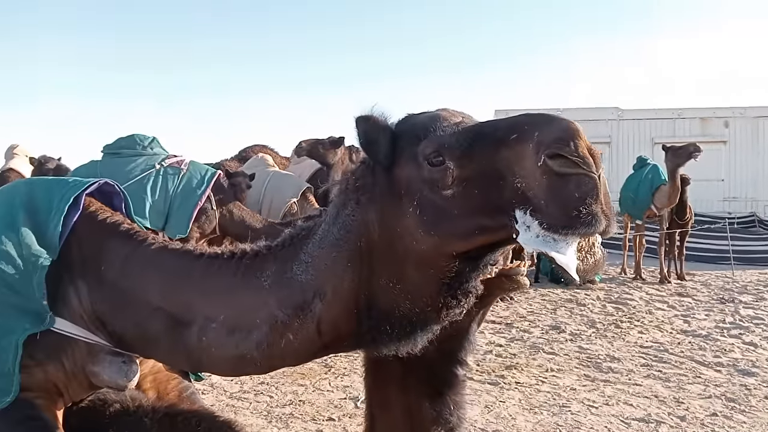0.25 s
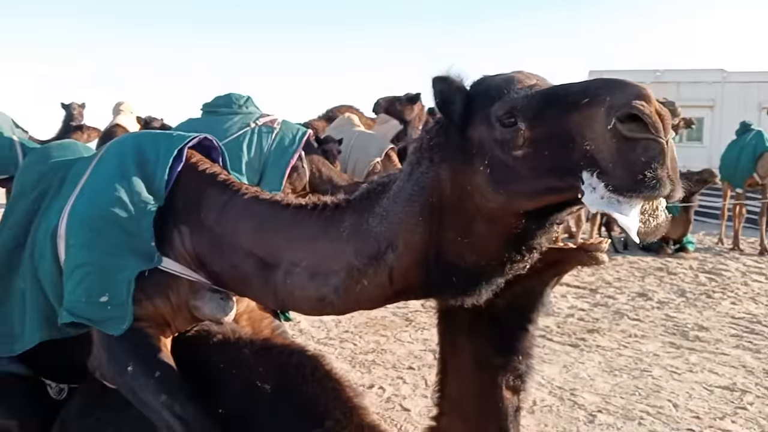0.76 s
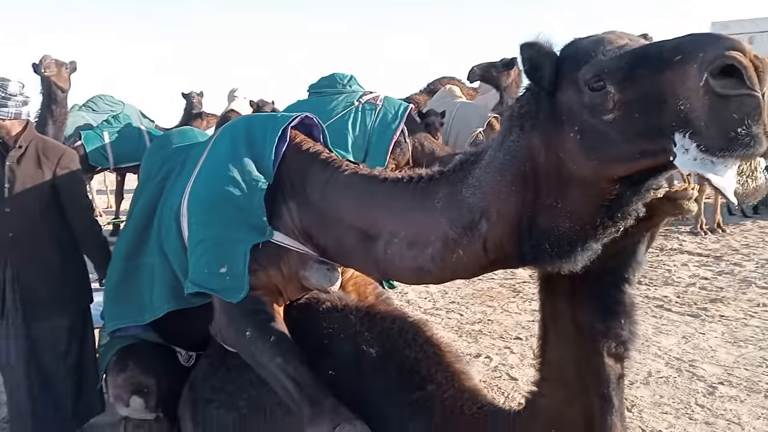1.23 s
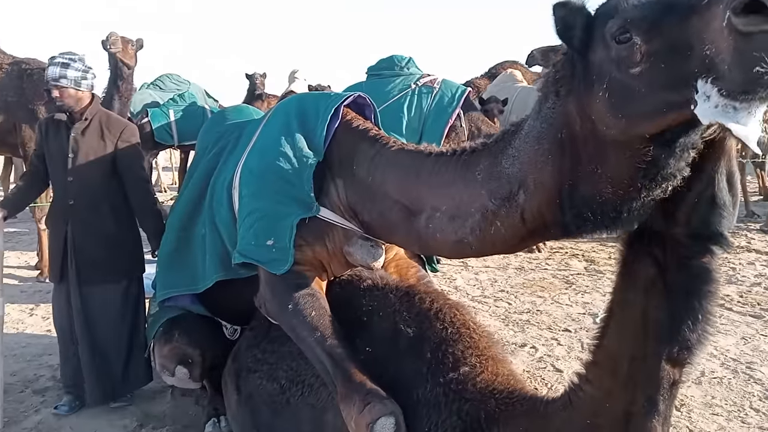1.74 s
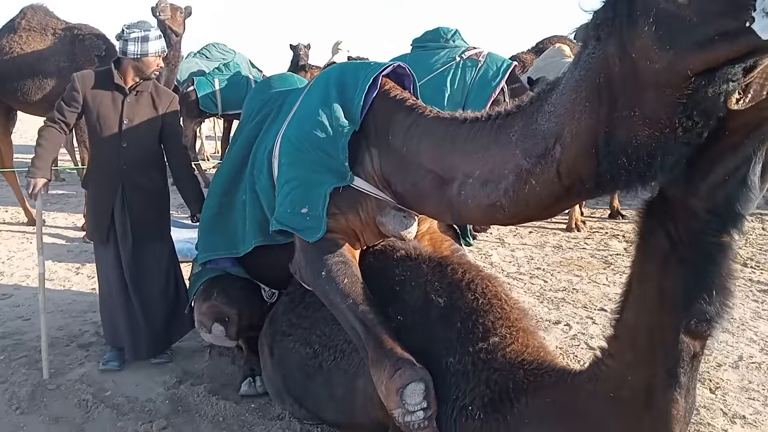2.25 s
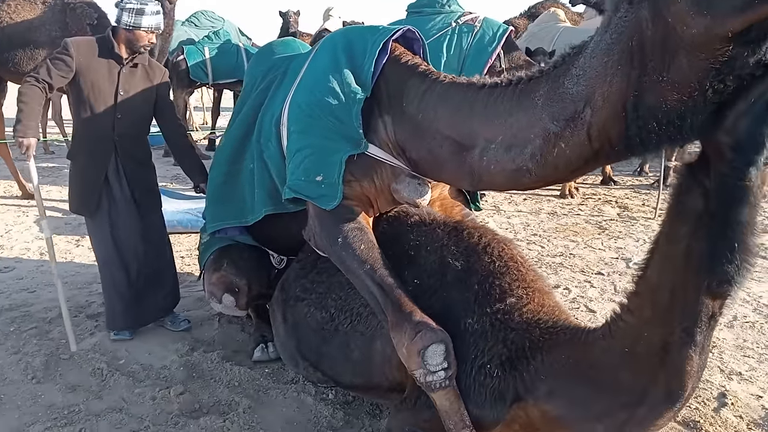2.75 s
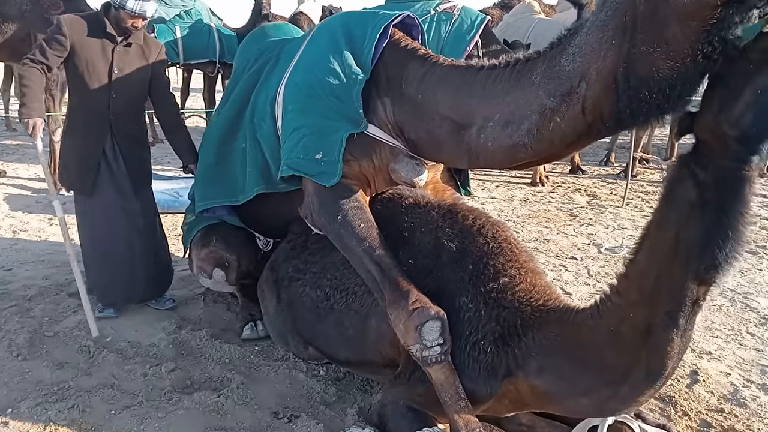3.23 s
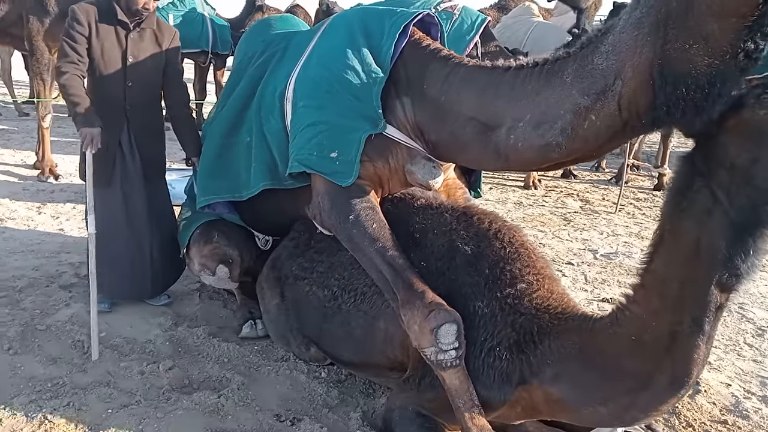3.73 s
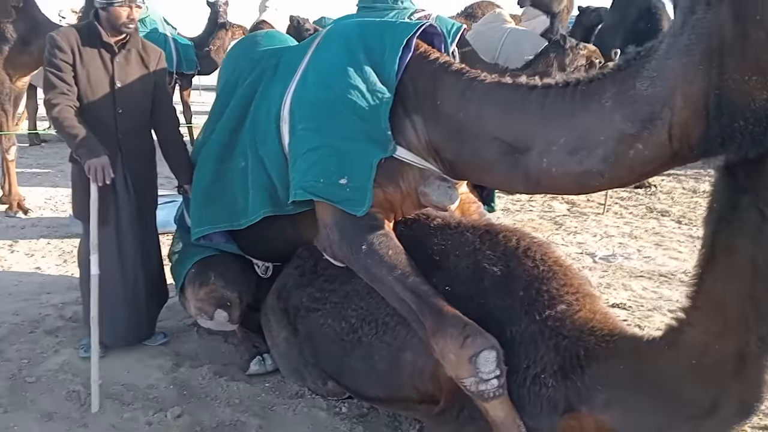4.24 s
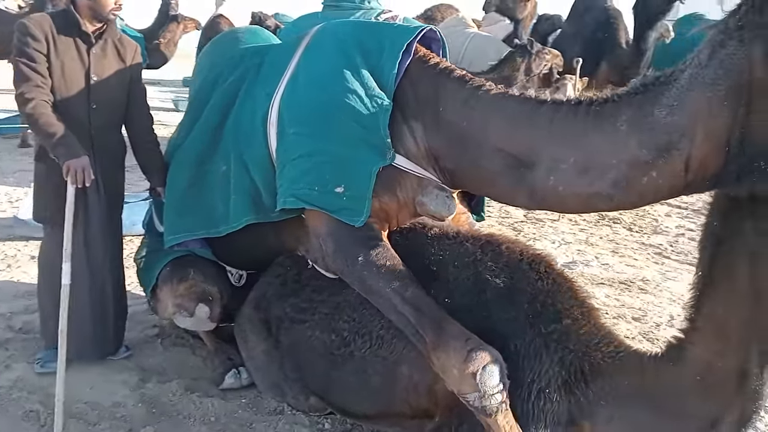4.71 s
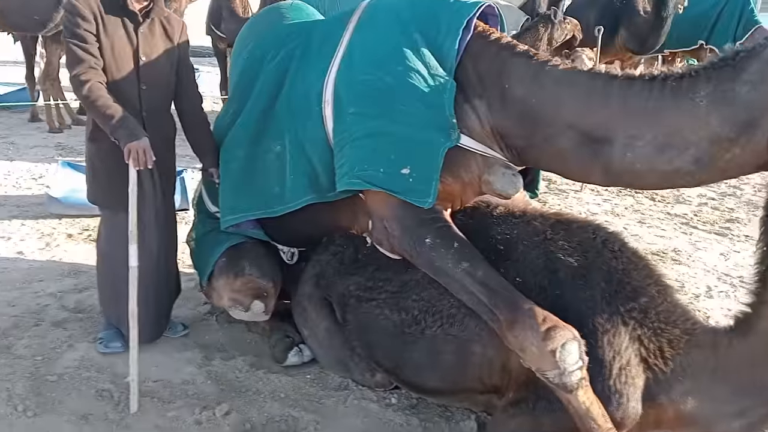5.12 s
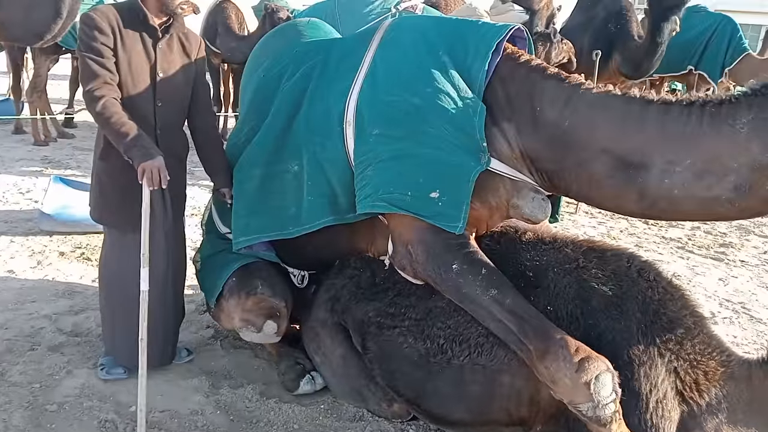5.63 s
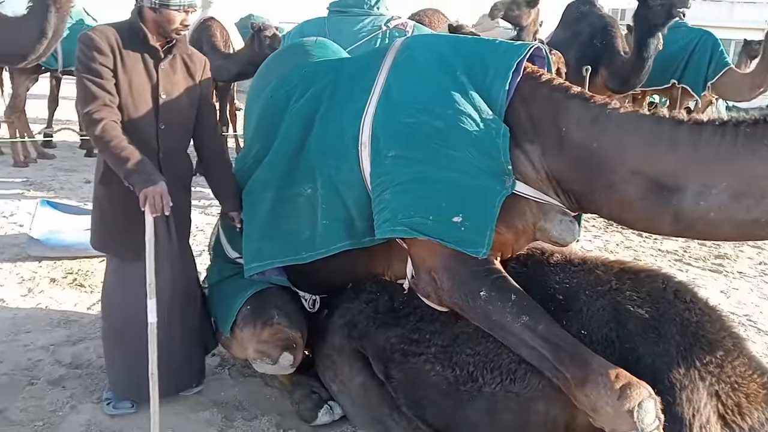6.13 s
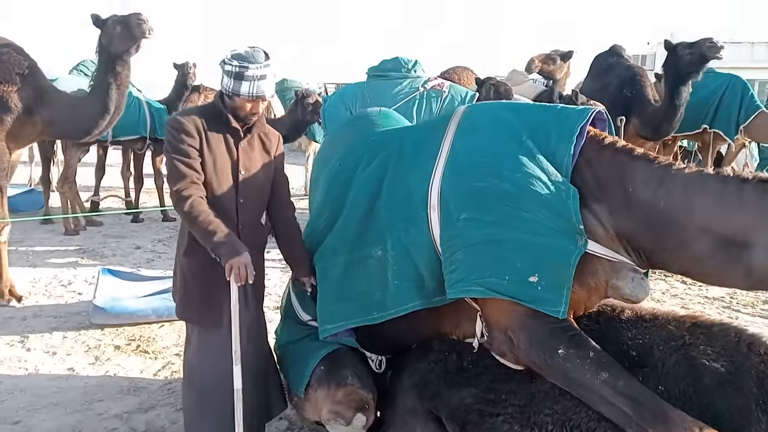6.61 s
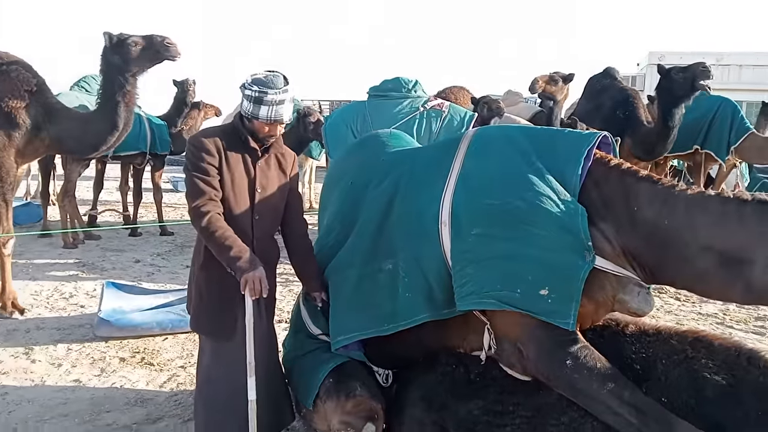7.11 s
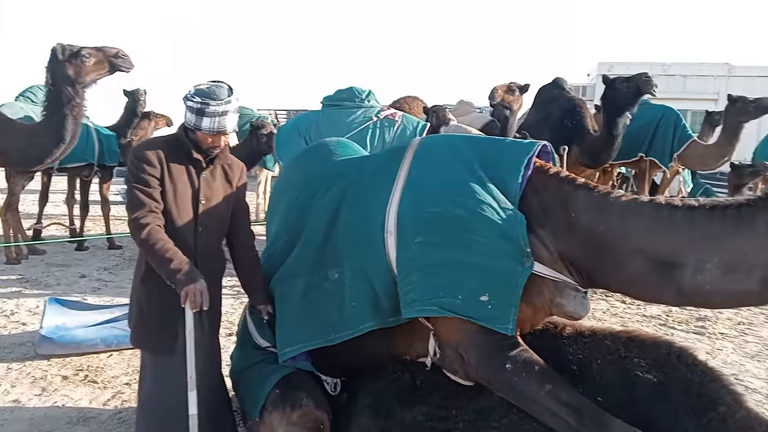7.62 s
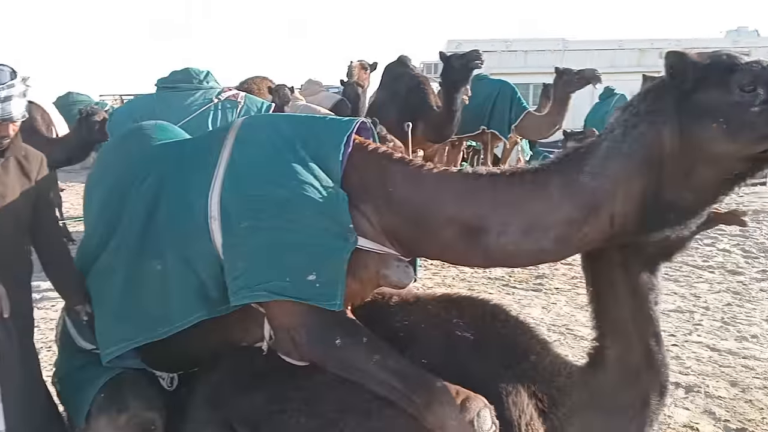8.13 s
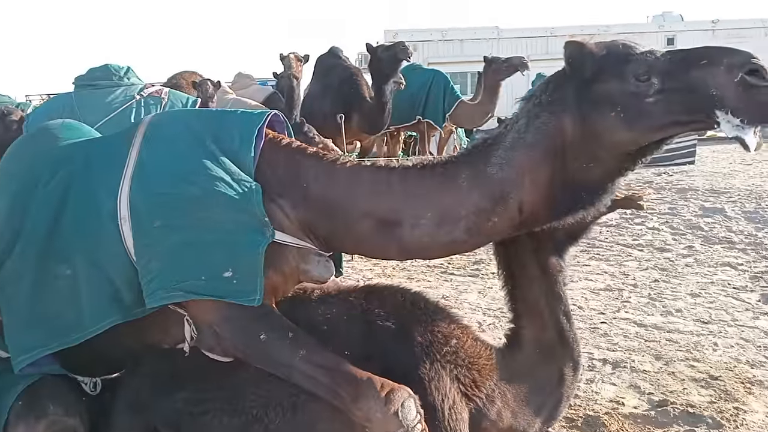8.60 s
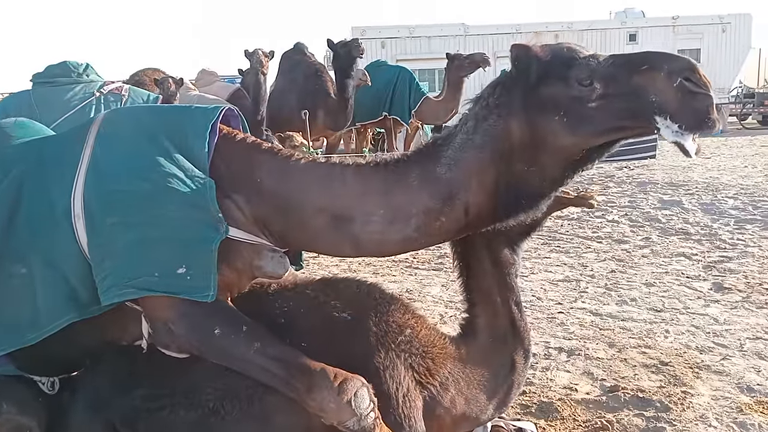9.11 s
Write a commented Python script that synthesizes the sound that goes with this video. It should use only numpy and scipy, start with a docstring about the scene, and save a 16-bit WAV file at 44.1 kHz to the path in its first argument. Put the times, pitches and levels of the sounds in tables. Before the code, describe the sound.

Five rough, guttural camel roars, the last three nearly joined, with thin rasps and frothy hisses between, under buffeting wind outdoors and a few bird chirps.

```python
"""Camel roaring in a windy pen

A rutting male camel roars in long calls close to a microphone in an open, windy pen.
Slack vocal folds slap unevenly, mostly strong and weak by turns, and ring four gliding throat resonances.
Thin rasps, squeaks, wet clicks and hisses of air come between and over the roars.
Gliding sines make the squeaks, a faint far whine near the end and a small bird.
Shaped noise makes the gusts on the microphone, the still air and a far herd."""
import sys
import numpy as np
from scipy import signal
from scipy.fft import rfft, irfft, next_fast_len
from scipy.io import wavfile
from scipy.ndimage import uniform_filter1d, minimum_filter1d, map_coordinates

SR = 44100
rng = np.random.default_rng(int(sys.argv[2]) if len(sys.argv) > 2 else 0)


def generate_wav(signal):
    """Clip the signal to [-1, 1] and save it as 16-bit WAV at the path in sys.argv[1]."""
    frames = np.transpose(np.atleast_2d(signal))
    scaled = np.clip(frames, -1, 1) * 32767
    pcm = np.round(scaled).astype(np.int16)
    wavfile.write(sys.argv[1], SR, pcm)


N = 412776
TIME_S = np.arange(N) / SR

# Course of each roar, one table a roar: (time [s], lowest resonance [Hz], effort [dB],
# second and third resonances over effort [dB], fourth resonance over effort [dB])
ROARS = [
    [(1.24, 293, -31.5, -14, -28), (1.3, 276, -10, -6.5, -17), (1.41, 315, -10, -6, -22.5),
     (1.56, 304, -14.5, -3, -20), (1.72, 278, -16.5, -2, -10.5), (1.85, 293, -15, -1, -12),
     (1.93, 264, -15, -15, -22.5), (2.03, 255, -26, -9, -12.5)],
    [(2.82, 235, -17, -10.5, -24), (2.89, 268, -6.5, -8.5, -38), (3.04, 265, -11.5, -7.5, -37),
     (3.13, 238, -16.5, -11, -35.5), (3.21, 262.6, -15.5, -4, -19), (3.35, 255, -10.5, -6, -18),
     (3.53, 248, -16.5, -6.5, -17.5), (3.68, 274.5, -16, -7, -12.5), (3.87, 279, -18.5, -4, -8),
     (4.05, 288, -23, -8, -15), (4.11, 267, -35.5, -18, -15)],
    [(6.2, 293, -36.5, -9.5, -25.5), (6.29, 316.5, -5.5, -12.5, -22.5), (6.39, 349, -14.5, -5.5, -24),
     (6.48, 352, -8.5, -12, -24.5), (6.58, 345, -16, -7.5, -15.5), (6.7, 310, -17.5, -11.5, -25),
     (6.8, 290, -40.5, -15.5, -32)],
    [(6.91, 293, -21, -39, -27.5), (6.99, 299, -23.5, -16.5, -25), (7.09, 306, -6, -16.5, -15.5),
     (7.26, 318, -13.5, -17, -9), (7.55, 313, -16.5, -15, -9.5), (7.68, 332, -22.5, -18.5, -11),
     (7.79, 325, -18.5, -18.5, -8)],
    [(7.78, 329, -24.5, -16, -11), (7.87, 300, -12, -12.5, -19), (7.96, 314, -11, -8.5, -17),
     (8.11, 353, -11.5, -4.5, -15), (8.25, 327.5, -15, -12.5, -18), (8.33, 318, -19, -13.5, -18),
     (8.53, 320, -14, -15.5, -15.5), (8.7, 286, -34.5, -30, -21.5)],
]
# Glides of the three higher throat resonances, one table a roar:
# (start [Hz], end [Hz], start level [dB], end level [dB])
GLIDES = [
    [(692, 659, 0, 0.5), (1142, 1010, -8.5, -10.5), (1720, 1590, 0, 1)],
    [(590, 703, 2, -2.5), (916, 1080, -13.5, -18), (1730, 1640, -2, 0.5)],
    [(660, 490, 1, -9.5), (964, 912, -9, 5), (1565, 1630, 1, -0.5)],
    [(860, 870, -1.5, 3.5), (1224, 1150, 6.5, -13), (1739, 1698, -1, -1)],
    [(734, 850, -2.5, -1.5), (1076, 1240, -17, -6.5), (1674, 1733, 3, -2)],
]
# Vocal folds, one row a roar: (first rate [slaps/s], settled rate [slaps/s], settling time [s],
# weakening of every second slap [0-1], irregularity at start [0-1], irregularity at end [0-1])
FOLDS = [(142.3, 74, .25, 0.43, 0.53, .48), (111, 61, .09, 0.14, .35, .1), (138.5, 58, .35, 0, .6, .42),
         (89.9, 73, 0.23, 0.32, .3, .3), (94.88, 72, .6, 0.41, .3, .55)]
# Marked slaps: (time [s], level against a typical slap [dB])
HARD_SLAPS = [(1.406, 3), (1.579, 2.5), (1.91, -1), (2.098, 3), (2.133, 4), (2.237, 9.5), (2.287, 4.5),
              (2.311, 10.5), (2.874, 4), (3.25, -0.5), (3.333, -0.5), (3.444, 2), (3.475, 2), (3.72, 0.5),
              (3.836, 8.5), (3.864, 10), (3.928, 6), (3.957, 9.5), (6.267, 5.5), (6.416, 7.5), (6.531, 6),
              (6.744, 13), (7.048, 0.5), (7.128, -0.5), (7.232, 5), (7.343, 2.5), (7.4, 2), (7.483, 2),
              (8.524, 2.5)]
# Four throat resonances: (width [Hz], skirt width [Hz])
THROAT = [(26.7, 177), (50, 430), (72.4, 730), (62, 230)]
# Neighbour of each throat resonance, one table a roar: (frequency factor [1], level [dB])
NEIGHBOURS = [
    [(1.377, -7), (1.143, -6.5), (1.11, -6), (1.08, -3)],
    [(1.68, -11), (1.263, -12), (1.7, -11), (1.14, -6.5)],
    [(3.75, -29.5), (1.1, -5.5), (1.3, -4), (1.07, 1.5)],
    [(1.645, -19), (0.702, 1), (.9, -13.5), (.94, -16.5)],
    [(1.63, -21.5), (1.1, -4.5), (.87, -5.5), (.92, -7)],
]
# Upper resonances of mouth and nose, one table a roar: (frequency [Hz], width [Hz], level [dB])
MOUTHS = [
    [(2286, 240, 2.5), (2480, 70, -11.5), (3320, 120, -3.5), (4000, 99, -7.5), (5000, 440, -18),
     (6200, 460, -22), (9900, 2100, -28.5)],
    [(2220, 310, -0.5), (2650, 270, -4), (3430, 170, -8.5), (3960, 180, -7), (5270, 690, -15),
     (6500, 890, -17.5), (9200, 1500, -25.5)],
    [(2130, 35, -2), (2500, 66, -12.5), (3270, 100, -12), (4000, 190, -12), (5050, 200, -25),
     (5900, 160, -18), (9600, 1500, -24)],
    [(2270, 69, 1), (2700, 130, -7.5), (3280, 540, -2.5), (4270, 240, -1.5), (5400, 250, -13.5),
     (6170, 220, -12.5), (9600, 1100, -15.5)],
    [(2000, 68, 5), (2187, 110, 4), (2700, 110, -2.5), (3350, 330, 1), (4200, 240, -2.5),
     (5400, 250, -15.5), (6230, 220, -15), (9000, 900, -19.5)],
]
# Mouth and nose relative to effort, one value a roar: (level [dB])
MOUTH_DB = [-27.5, -32, -37, -36, -36.5]
MOUTH_SHARE = 0.23  # share of the fourth resonance's lift

# Thin open-mouthed rasps: (start [s], length [s], start frequency [Hz], end frequency [Hz],
# level [dB], upper resonances' level [dB])
RASPS = [(-.08, .24, 1750, 1700, -41, -50), (1.982, .52, 1663, 1454, -25.5, -37.5),
         (2.755, 0.26, 2500, 2405, -43.5, -57), (7.723, 0.23, 1965, 2146, -37.5, -49.5),
         (9.193, .28, 1510, 1530, -43.5, -46)]
# Vocal folds in a rasp: (columns as in FOLDS)
RASP_FOLDS = (72, 64, 0.16, 0.25, .62, .56)
# Rasp resonances: (factor on main resonance [1], width [Hz], level [dB])
RASP_MODES = [(0.632, 107, -7.5), (.9, 55, -9.5), (0.996, 47.6, -1.5), (1.149, 50, -14)]
# Upper resonances, mouth wide open: (frequency [Hz], width [Hz], level [dB])
GAPE = [(2050, 70, -5), (2242, 34, 3), (3130, 70, -8), (3270, 31, -1.5), (3805, 250, -7.5), (4060, 89, -13),
        (5600, 600, -24), (6960, 600, -29.5), (9550, 700, -32.5)]
RASP_RISE_S, RASP_FALL_S = 0.12, 0.11

# Squeaks as the voice catches, and last a faint far whine:
# (start [s], length [s], start frequency [Hz], end frequency [Hz], level [dB])
SQUEAKS_AND_WHINE = [(2.795, 0.037, 1377, 1604, -28.5), (7.715, 0.037, 1370, 1570, -33),
                     (9.0, 0.18, 1400, 1375, -57.5)]
# Wet mouth clicks: (time [s], peak level [dB], frequency [Hz])
SMACKS = [(1.39, -39.5, 4000), (5.737, -47, 3000), (5.784, -30, 1440), (5.871, -40, 1900),
          (7.865, -35.5, 4470), (7.881, -43, 5000), (7.958, -40, 4000)]

# Hisses of the camel's air, before BLOW_TRIM_DB: (start [s], length [s], start level [dB], end level [dB])
BLOWS = [(2.453, 0.47, -46, -49.5), (4.058, 0.87, -46.5, -51.5), (5.069, .52, -51, -54.5),
         (6.733, 0.55, -48.5, -47.5)]
# Hiss spectra, one table a blow: (frequency [Hz], level [dB])
BLOW_COLOURS = [
    [(1000, 5), (1900, 6.5), (2600, -7.5), (3400, -4), (4500, -14), (6400, -19), (8000, -27), (14000, -38)],
    [(1000, -0.5), (2300, 3.5), (2800, -2.5), (3400, 7.5), (4600, 1.5), (5400, -13.5), (7000, -13.5),
     (8000, -25), (9500, -24), (14000, -39)],
    [(1000, 4.5), (2300, 0.5), (3200, 2), (4400, -4), (5400, -8.5), (7000, -11.5), (8000, -21), (9500, -21),
     (14000, -31)],
    [(900, 4), (1800, 9.5), (2800, 3), (3800, 3), (5000, -6.5), (6200, -10.5), (7500, -23), (9500, -25),
     (14000, -36.5)],
]
BLOW_RISE_S, BLOW_FALL_S = 0.048, 0.05
BLOW_TRIM_DB, BLOW_ARCH_DB = -5.0, 4  # the arch lifts the middle

# Bird notes, before BIRD_TRIM_DB: (start [s], length [s], start frequency [Hz], end frequency [Hz], level [dB])
CHIRPS = [(5.31, .06, 6300, 4000, -62), (5.385, 0.031, 3600, 5000, -45), (5.835, 0.029, 5600, 7600, -58.5),
          (5.855, 0.075, 6500, 3960, -51.5), (5.87, 0.08, 6730, 5400, -68),
          (5.945, 0.032, 3690, 4580, -44.5), (5.975, 0.01, 4550, 3980, -61.5),
          (7.16, 0.043, 5930, 5050, -48.5), (7.24, 0.048, 3950, 3770, -44)]
BIRD_TRIM_DB = -6.5

# Strongest gusts: (middle [s], length [s], rumble level [dB], eddy level [dB])
GUSTS = [(0.044, 0.044, -32.5, -15), (0.413, 0.058, -11.5, -10), (0.494, 0.092, -27, -12),
         (.905, 0.091, -14.5, -30.5), (0.999, 0.097, -14.5, -25.5), (1.072, 0.1, -17.5, -39),
         (2.155, 0.14, -15, -28), (2.381, 0.12, -16.5, -19.5), (2.668, 0.13, -15, -26),
         (2.813, 0.093, -14, -19.5), (3.302, 0.1, -19.5, -36), (4.258, 0.14, -21.5, -42),
         (4.44, 0.13, -19.5, -45), (4.551, 0.031, -20, -47), (4.708, 0.11, -22, -36),
         (4.998, 0.26, -19, -21), (5.188, 0.071, -17.5, -47), (5.522, 0.11, -22, -26),
         (5.663, 0.058, -19.5, -18.5), (6.055, 0.11, -13.5, -23.5), (6.992, 0.048, -13.5, -16),
         (8.11, 0.092, -15.5, -31), (8.398, 0.18, -15.5, -18), (8.546, .07, -11, -23.5),
         (8.637, 0.12, -17.5, -15.5), (8.904, 0.14, -12.5, -15.5), (8.998, 0.1, -15.5, -14.5),
         (9.167, 0.066, -10, -14.5), (9.208, 0.09, -11, -13), (9.295, 0.1, -10.5, -17.5),
         (9.35, 0.055, -1, -12)]
# Breeze between gusts, before buffeting: (time [s], rumble level [dB], eddy level [dB])
BREEZE = [(0, -31.5, -18), (.74, -21, -21), (.86, -30, -35), (1.25, -23.5, -39), (1.88, -37.5, -41.5),
          (2.12, -24.5, -27), (2.75, -17.5, -24.5), (3.05, -29.5, -35), (3.9, -31.5, -40.5),
          (4.35, -27, -43), (5.4, -26, -37.5), (6.2, -29.5, -41.5), (6.45, -53.5, -60), (6.9, -33.5, -53),
          (7.04, -23.5, -39), (7.85, -32.5, -41), (8.45, -22.5, -34.5), (9.36, -27, -31.5)]
# Spectrum of the rumble: (frequency [Hz], level [dB])
GUST_COLOUR = [(15, -49.5), (28, -36.5), (45, -13.5), (70, 2.5), (100, 6), (150, 6.5), (220, 0.5),
               (300, -7.5), (450, -21.5), (700, -45.5), (1500, -81)]
# Spectrum of the eddies: (frequency [Hz], level [dB])
EDDY_COLOUR = [(100, -35.5), (200, 12.5), (300, 8), (450, 1.5), (700, -9), (1000, -20), (1500, -31),
               (2500, -46.5), (5000, -61), (12000, -77.5)]

# Far herd lowing: (frequency [Hz], width [Hz], level [dB])
HERD = [(730, 160, -61.5), (1534, 28, -68.5), (1900, 140, -68)]
# Spectrum of the still air: (frequency [Hz], level [dB])
AIR = [(50, -15), (150, 0.5), (350, -15.5), (700, -29), (1100, -34), (1900, -31), (2400, -47), (3400, -42),
       (5000, -53.5), (7000, -54), (10000, -62), (15000, -70.5)]
AIR_DB = -41.5
EDGE_HZ = 15500


def roar(rows, glides, tension, neighbours, upper_modes, upper_db):
    """Slaps ring the long throat; its resonances glide, and bend a little with the lowest one."""
    low_air, high_air = 0.94, 12.0  # puff noise against slaps, throat and mouth
    throb_db, gurgle_db, follow = 1.85, 2, 0.13
    t, low_hz, effort_db, middle_db, front_db = controls(rows)
    effort_db = effort_db + throb_db * wander(t, 22)
    bend = (low_hz / low_hz.mean()) ** follow
    tracks = [(low_hz, effort_db)]
    for (hz0, hz1, db0, db1), lift_db in zip(glides, [middle_db, middle_db, front_db]):
        glide_hz = bend * np.linspace(hz0, hz1, len(t))
        tracks.append((glide_hz, effort_db + lift_db + np.linspace(db0, db1, len(t))))

    slaps, puffs, rough = folds(t, tension, puff_decay_s=0.0079, leak=0.15)
    mouth_level_db = effort_db + upper_db + MOUTH_SHARE * front_db
    sound = gain_of(mouth_level_db) * mouth(t, evened(slaps) + high_air * puffs, upper_modes)
    # a hard slap is brighter: higher resonances follow its strength more steeply
    powers = np.linspace(0.45, 1.9, len(THROAT))
    for k, power in enumerate(powers):
        drive = evened(slaps ** power) + low_air / power * rough * puffs
        drive *= gain_of(gurgle_db * wander(t, 59.9))  # the colour varies quickly
        (hz, level_db), (width_hz, skirt_hz), (factor, neighbour_db) = tracks[k], THROAT[k], neighbours[k]
        hz = hz * (1 + 0.013 * wander(t, 40) + 0.01 * wander(t, 8))
        ring = evened(resonate(drive, hz, width_hz, skirt_hz))
        neighbour = resonate(drive, hz * factor, width_hz * factor, skirt_hz)
        ring += gain_of(neighbour_db) * evened(neighbour)
        polarity = (-1) ** k
        sound += polarity * gain_of(level_db) * levelled(ring, 0.054)
    return t[0], faded(sound)


def folds(t, tension, puff_decay_s, leak):
    """Uneven slaps slow as the folds slacken; a decaying puff of noisy air follows each."""
    first_per_s, settled_per_s, settling_s, weakening, rough_start, rough_end = tension
    rate_per_s = settled_per_s + (first_per_s - settled_per_s) * np.exp(-(t - t[0]) / settling_s)
    rough = np.linspace(rough_start, rough_end, len(t))
    turns = np.cumsum(rate_per_s * np.exp(0.5 * rough * wander(t, 130))) / SR

    # whole strong-weak pairs fit between one marked slap and the next
    hard = np.reshape([row for row in HARD_SLAPS if t[0] < row[0] < t[-1]], (-1, 2))
    free_turns = np.interp(np.r_[t[0], hard[:, 0], t[-1]], t, turns)
    pairs = np.maximum(np.round(np.diff(free_turns) / 2), 1)
    whole_turns = np.r_[0, np.cumsum(2 * pairs)]
    slap_at = np.flatnonzero(np.diff(np.floor(np.interp(turns, free_turns, whole_turns))))

    sizes_db = (0.5 + 2.0 * rough[slap_at]) * rng.standard_normal(1024)[:len(slap_at)]
    sizes_db[whole_turns[1:-1].astype(int) - 1] = hard[:, 1]
    is_weak = np.arange(len(slap_at)) % 2 == 0
    slaps = np.zeros(len(t))
    slaps[slap_at] = gain_of(sizes_db) * (1 - np.clip(weakening, 0, 1) * is_weak)
    opening = signal.lfilter([1], [1, -np.exp(-1 / (puff_decay_s * SR))], slaps)
    puffs = evened((opening + leak) * rng.standard_normal(N)[:len(t)])
    return slaps, puffs, rough


def mouth(t, drive, modes):
    """Upper resonances drift as lips and tongue move; froth makes them crackle and flutter."""
    drive = drive * gain_of(3.0 * wander(t, 500))
    rings = 0
    for hz, width_hz, db in modes:
        drift = 1 + 0.022 * wander(t, 7)
        flutter_db = 3.5 * wander(t, 16)
        rings += gain_of(db + flutter_db) * evened(resonate(drive, hz * drift, width_hz, 380 + width_hz))
    return levelled(rings, 0.11)


def rasp(start_s, length_s, start_hz, end_hz, level_db, upper_db):
    """Airy slaps ring only the front of the mouth, whose resonance glides."""
    t = np.arange(max(start_s, 0), start_s + length_s, 1 / SR)
    hz = np.linspace(start_hz, end_hz, len(t)) * (1 + 0.012 * wander(t, 25))
    slaps, puffs, _ = folds(t, RASP_FOLDS, puff_decay_s=0.005, leak=0.11)
    drive = evened(slaps) + 1.8 * puffs
    ring = 0
    for factor, width_hz, db in RASP_MODES:
        ring += gain_of(db) * evened(resonate(drive, hz * factor, width_hz, 180))
    front = gain_of(level_db) * levelled(ring, 0.063)
    upper = gain_of(upper_db) * mouth(t, drive, GAPE)
    return t[0], faded(swell(t, start_s, length_s, RASP_RISE_S, RASP_FALL_S) * (front + upper))


def smacks():
    """Froth and tongue snap in the mouth: decaying noise bursts through a broad resonance."""
    decay_s = 0.0026
    out, t = np.zeros(N), np.arange(2048) / SR
    for at_s, peak_db, hz in SMACKS:
        burst = rng.standard_normal(len(t)) * np.exp(-t / decay_s)
        snap = resonate(burst, hz, hz, 2 * hz)
        add(out, at_s, gain_of(peak_db) * snap / abs(snap).max())
    return out


def blows():
    """The camel's air hisses through froth and nostrils: coloured noise of fluttering level."""
    out = np.zeros(N)
    for (start_s, length_s, start_db, end_db), colour in zip(BLOWS, BLOW_COLOURS):
        t = np.arange(start_s, start_s + length_s, 1 / SR)
        arch_db = BLOW_ARCH_DB * np.sin(np.pi * (t - start_s) / length_s)
        flutter_db = 1.1 * wander(t, 120) + 2.0 * wander(t, 18)
        level_db = BLOW_TRIM_DB + np.linspace(start_db, end_db, len(t)) + arch_db + flutter_db
        envelope = swell(t, start_s, length_s, BLOW_RISE_S, BLOW_FALL_S)
        add(out, start_s, noise(colour)[:len(t)] * gain_of(level_db) * envelope)
    return out


def whistles(rows, waver, overtone_db):
    """Thin tonal notes: short gliding sines with one overtone and a wavering pitch."""
    out = np.zeros(N)
    for start_s, length_s, start_hz, end_hz, db in rows:
        t = np.arange(0, length_s, 1 / SR)
        hz = np.linspace(start_hz, end_hz, len(t)) * (1 + waver * wander(t, 350))
        phase = 2 * np.pi * np.cumsum(hz) / SR
        note = np.sin(phase) + gain_of(overtone_db) * np.sin(2 * phase)
        add(out, start_s, gain_of(db) * evened(note * signal.windows.tukey(len(t), 0.7)))
    return out


def pen(x, wet_db, t60_s):
    """The sand returns one quick echo; animals and huts scatter a faint tail."""
    t = np.arange(SR // 2) / SR
    scattered = rng.random(len(t)) < 1500 / SR  # 1500 echoes/s
    decay = gain_of(-60 * t / t60_s)
    taps = rng.standard_normal(len(t)) * scattered * (t > 0.004) * decay
    out = x + gain_of(wet_db) * signal.oaconvolve(x, taps / np.linalg.norm(taps))[:N]
    add(out, 0.0062, gain_of(-14) * x)  # ground echo
    return out


def wind():
    """A buffeting breeze and single gusts thump the microphone and break into brighter eddies."""
    lumps_db = 3.0 * wander(TIME_S, 45)
    rumble = levelled(noise(GUST_COLOUR) * gain_of(lumps_db), 0.038)
    tearing = levelled(noise(EDDY_COLOUR) * gain_of(lumps_db + 2 * wander(TIME_S, 220)), 0.027)
    breeze_s, push_db, tear_db = np.transpose(BREEZE)
    buffets_db = 3.0 * wander(TIME_S, 24)
    push = gain_of(np.interp(TIME_S, breeze_s, push_db) + buffets_db)
    tear = gain_of(np.interp(TIME_S, breeze_s, tear_db) + buffets_db)
    for middle_s, length_s, rumble_db, eddy_db in GUSTS:
        arch = np.clip(1 - (2 * (TIME_S - middle_s) / length_s) ** 2, 0, 1) ** 1.5
        push = np.maximum(push, gain_of(rumble_db) * arch)
        tear = np.maximum(tear, gain_of(eddy_db) * arch)
    return faded(push * rumble + tear * tearing)


def distance():
    """Still air as coloured noise; the far herd as resonant noise that swells and fades."""
    herd = 0
    for hz, width_hz, db in HERD:
        swell_db = 2.6 * wander(TIME_S, 7.6)
        herd += gain_of(db + swell_db) * evened(resonate(rng.standard_normal(N), hz, width_hz, 400))
    return herd + gain_of(AIR_DB) * noise(AIR)


def resonate(x, hz, width_hz, skirt_hz):
    """A moving resonance; two more poles steepen its skirts and soften its attack."""
    turn = np.exp(2j * np.pi * np.cumsum(hz * np.ones(len(x))) / SR)
    z = x / turn + 1e-18  # shifted down to 0 Hz
    for r in np.exp(-np.pi * np.array([width_hz, skirt_hz, 2 * skirt_hz]) / SR):
        z = signal.lfilter([1 - r], [1, -r], z)
    return 2 * (turn * z).real


def noise(colour):
    """Noise of unit rms with a given spectrum."""
    f_hz, db = np.transpose(colour)
    size = next_fast_len(N)
    hz = np.fft.rfftfreq(size, 1 / SR)
    shape = gain_of(np.interp(np.log(hz + 1), np.log(f_hz + 1), db))
    return evened(irfft(rfft(rng.standard_normal(size)) * shape, size)[:N])


def wander(t, per_s):
    """Smooth chance of about unit size, per_s random knots a second."""
    place = (t - t[0]) * per_s
    grid = np.arange(0, place[-1] + 1, 0.125)
    knots = rng.standard_normal(4096)
    return np.interp(place, grid, map_coordinates(knots, [grid], order=2, mode="wrap"))


def controls(rows):
    """Sample times of a table, then each of its columns at those times."""
    s, *columns = np.transpose(rows)
    t = np.arange(s[0], s[-1], 1 / SR)
    return [t] + [np.interp(t, s, column) for column in columns]


def swell(t, start_s, length_s, rise_s, fall_s):
    """Attack, hold and release of one event at the times t."""
    return np.clip((t - start_s) / rise_s, 0, 1) * np.clip((start_s + length_s - t) / fall_s, 0, 1)


def faded(x):
    """Softens both ends over 5 ms."""
    return x * signal.windows.tukey(len(x), min(0.01 * SR / len(x), 1))


def levelled(x, seconds):
    """Holds the running rms near one, keeping faster detail."""
    size = max(int(seconds * SR), 3)
    power = uniform_filter1d(uniform_filter1d(x ** 2, size), size)
    return x / np.sqrt(abs(power) + 1e-4 * np.mean(x ** 2))


def evened(x):
    """Scales to unit rms."""
    return x / np.sqrt(np.mean(x ** 2) + 1e-20)


def gain_of(db):
    """Amplitude factor of a level in dB."""
    return 10 ** (np.asarray(db) / 20)


def add(mix, at_s, sound):
    """Adds a sound to the mix in place, cut at the mix's end."""
    part = mix[max(round(at_s * SR), 0):][:len(sound)]
    part += sound[:len(part)]


def scene():
    """Roars, smaller calls, a far whine and a bird in the pen, with wind and the far herd."""
    calls = whistles(SQUEAKS_AND_WHINE, waver=0.025, overtone_db=-24.5) + smacks()
    for call in zip(ROARS, GLIDES, FOLDS, NEIGHBOURS, MOUTHS, MOUTH_DB):
        add(calls, *roar(*call))
    for row in RASPS:
        add(calls, *rasp(*row))
    bird = gain_of(BIRD_TRIM_DB) * whistles(CHIRPS, waver=0.062, overtone_db=-29.5)
    echoed = pen(calls, wet_db=-16.5, t60_s=0.6) + pen(bird, wet_db=-12.5, t60_s=0.7)
    return (echoed + blows() + wind() + distance())[None]


def record(dry):
    """A limiter holds the peaks to full scale; a low-pass then sets the band limit."""
    room = 1 / np.maximum(abs(dry[0]), 1)
    limited = dry * uniform_filter1d(minimum_filter1d(room, size=301), size=301)
    low_pass = signal.firwin(511, EDGE_HZ, window=("kaiser", 9), fs=SR)
    return signal.oaconvolve(limited, low_pass[None], "same")


dry = scene()
out = record(dry)
generate_wav(out)
```